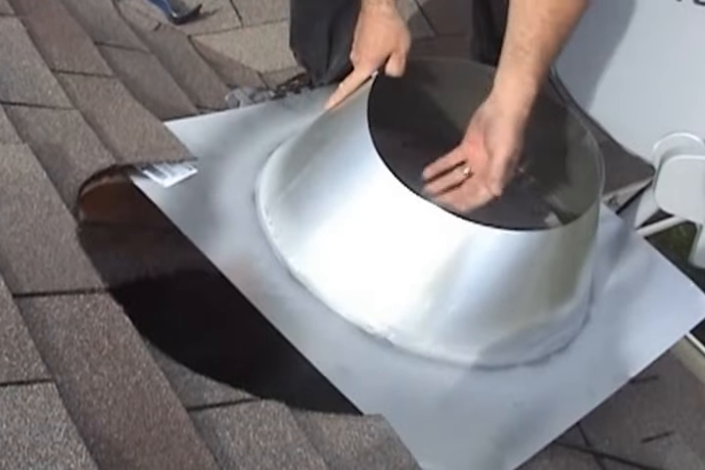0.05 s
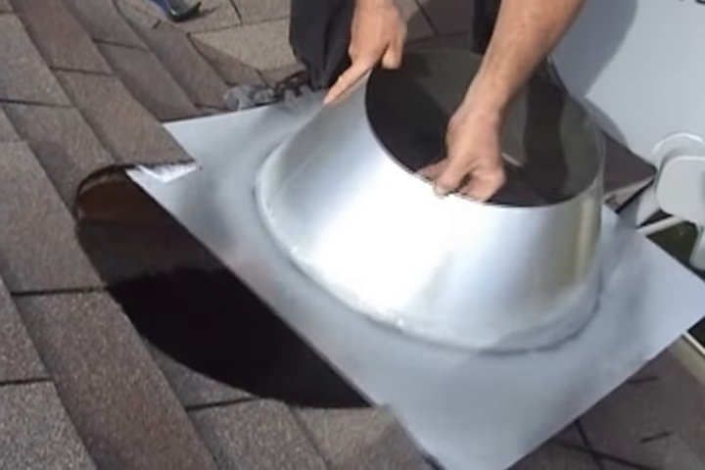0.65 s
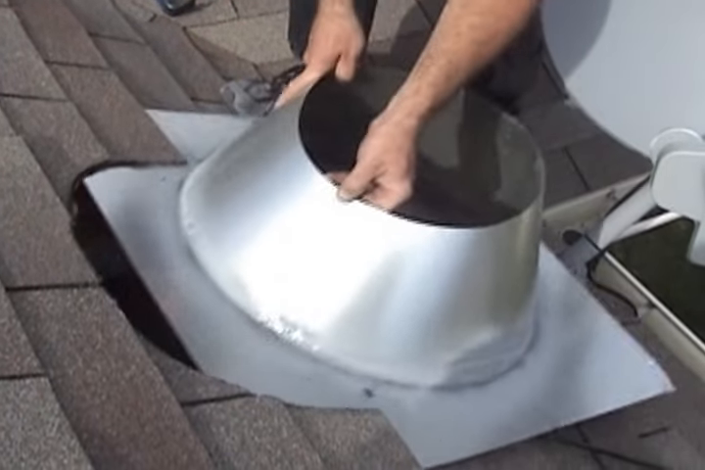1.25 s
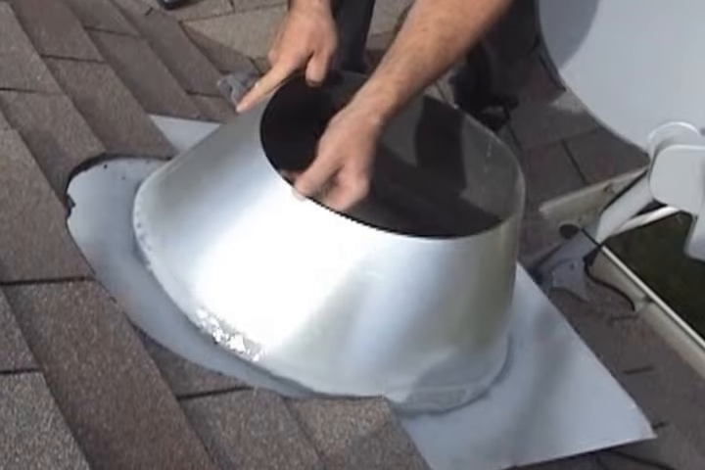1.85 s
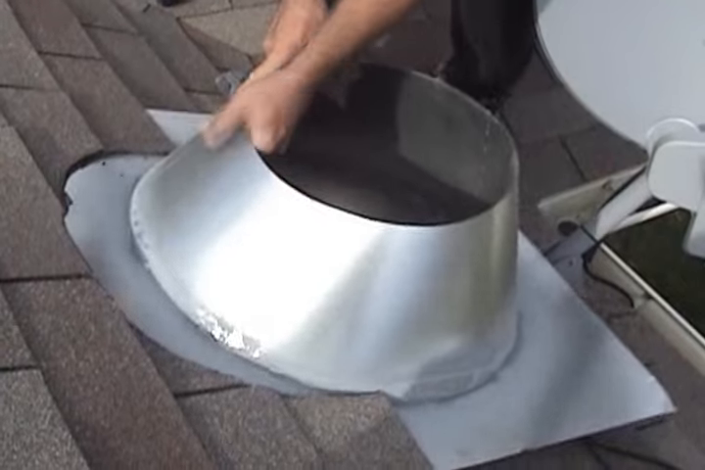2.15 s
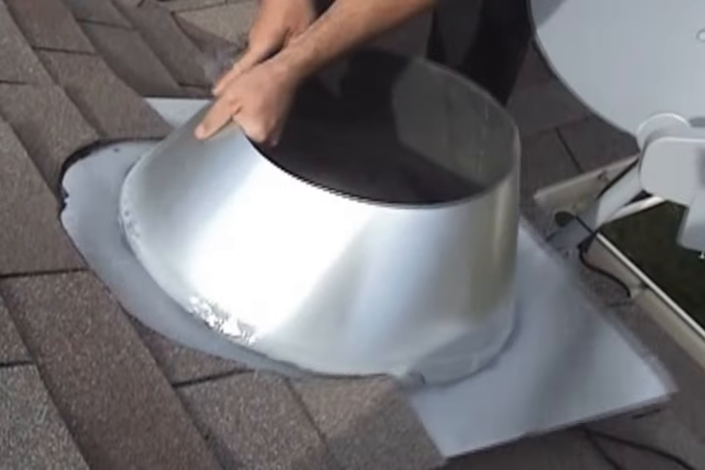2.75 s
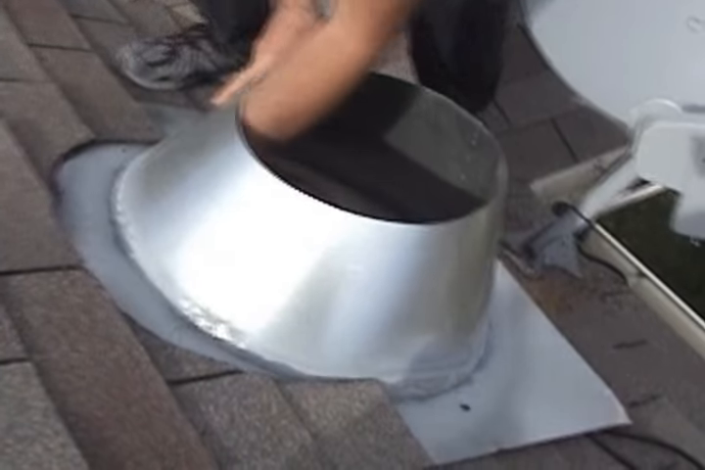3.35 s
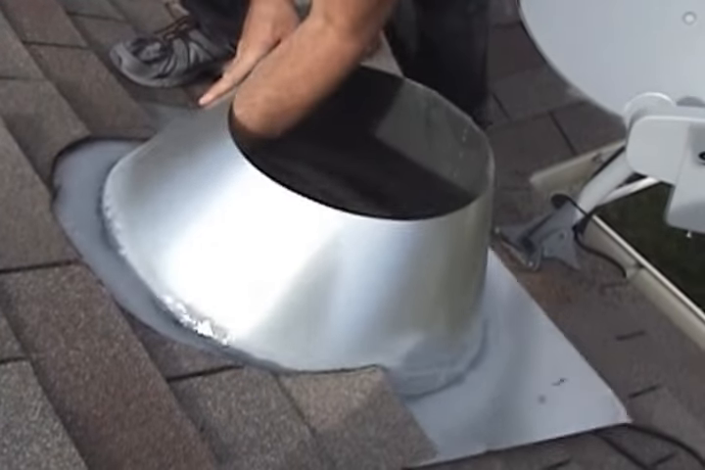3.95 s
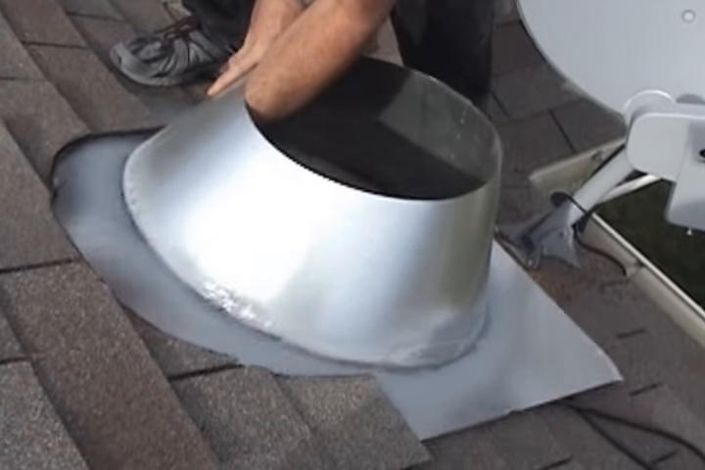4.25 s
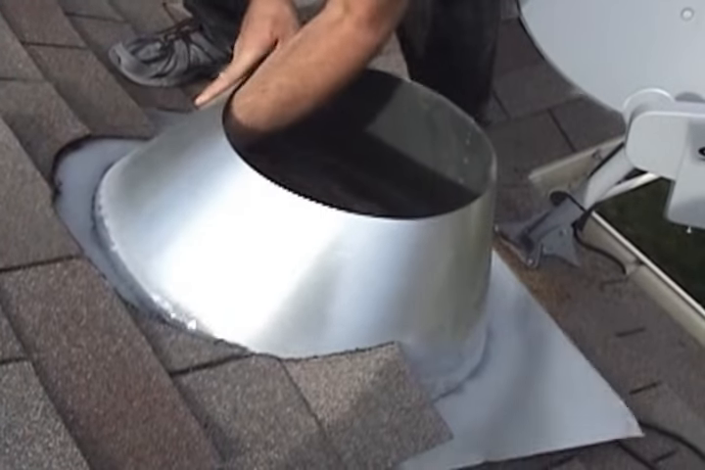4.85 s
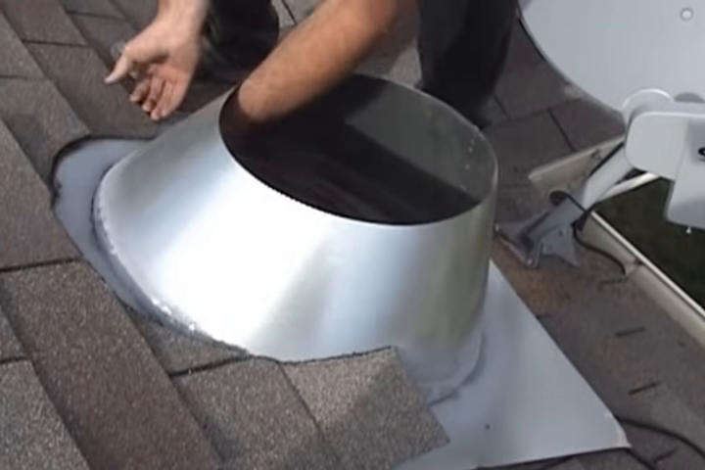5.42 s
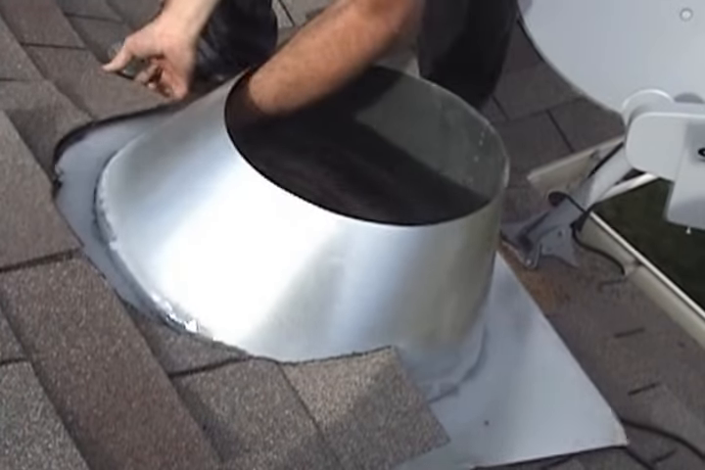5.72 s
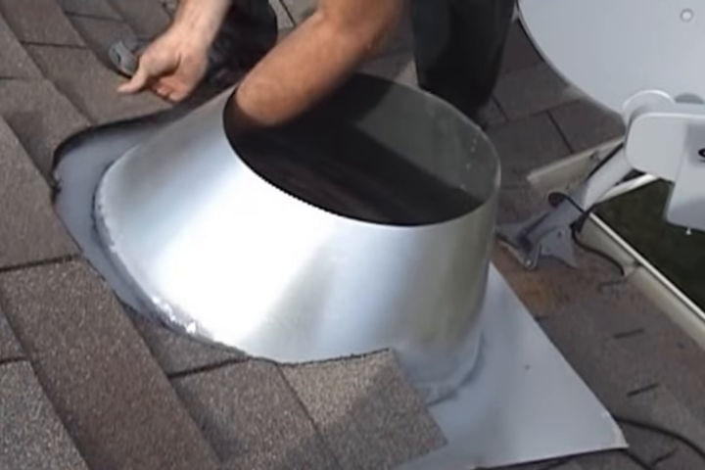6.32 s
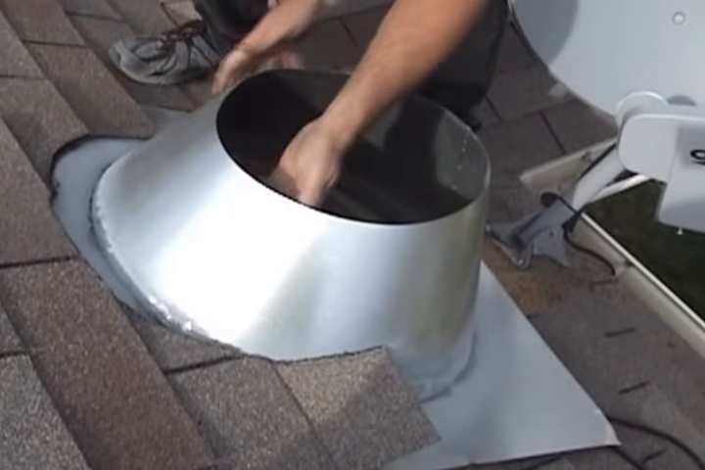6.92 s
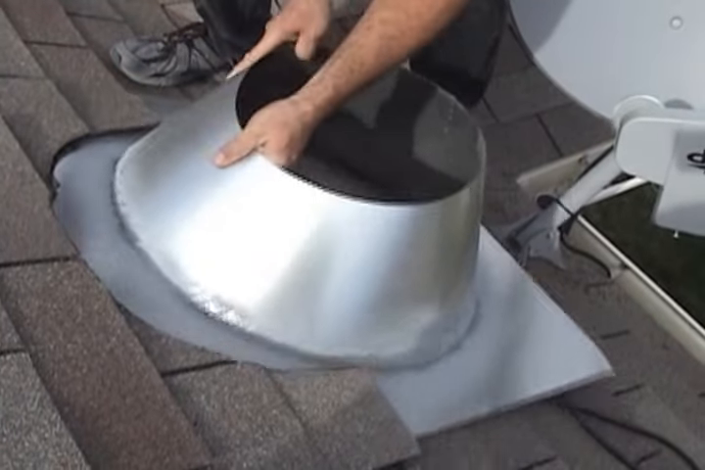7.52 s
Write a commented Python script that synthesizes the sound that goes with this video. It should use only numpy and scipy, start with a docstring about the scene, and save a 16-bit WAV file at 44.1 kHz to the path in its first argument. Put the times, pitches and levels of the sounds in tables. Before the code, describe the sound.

Thin sheet metal is shoved over gritty roof shingles in short scraping bursts, clanking and booming hollowly, while wind buffets the microphone.

```python
"""On an asphalt-shingle roof, hand-held camera about a metre from a sheet-metal flashing with a wide cone.
Wind flutters on the two microphone ports; hands and knees crunch faintly. After a first nudge the
flashing is shoved and wiggled in under the shingles: its edge grinds over the mineral grit, cracks
granules, catches and slips free, and the thin sheet booms as it flexes. A lull comes at 5.5 s, then
more shoves; an eddy thumps the microphone hard at 7 s, just before the last push."""
import sys
import numpy as np
from scipy import signal
from scipy.fft import rfft, irfft, next_fast_len
from scipy.io import wavfile
from scipy.ndimage import map_coordinates

SR = 44100
rng = np.random.default_rng(int(sys.argv[2]) if len(sys.argv) > 2 else 0)


def transcribe(signal):
    """Save signal, clipped to [-1, 1], as a 16-bit WAV file at the path in sys.argv[1]."""
    frames = np.atleast_2d(signal).T
    limited = np.clip(frames, -1, 1)
    pcm = np.round(limited * 32767).astype(np.int16)
    wavfile.write(sys.argv[1], SR, pcm)


N = 338688


def amp(db):
    """Decibels to gain."""
    return 10 ** (np.asarray(db) / 20)


def unit(x):
    """x scaled to rms 1."""
    return x / np.sqrt(np.mean(x ** 2) + 1e-20)


def along(points, hz):
    """(Hz, value) points read on a log frequency axis."""
    f, v = np.transpose(points)
    return np.interp(np.log(hz + 1), np.log(f), v)


def wobble(rate):
    """A smooth random curve, rate knots a second."""
    knots = rng.standard_normal(int(N * rate / SR) + 4)
    return map_coordinates(knots, [np.arange(N) * rate / SR])


def filtered(x, gain):
    """x times a gain that depends on frequency."""
    n = x.shape[-1]
    padded = next_fast_len(n + 2048)
    return irfft(rfft(x, padded) * gain(np.fft.rfftfreq(padded, 1 / SR)), padded)[..., :n]


def noise(colour_db, spread, size):
    """Noise of rms 1 at the left and right ports, as unlike as the spread says."""
    mid, side = rng.standard_normal((2, size))
    side = filtered(side, lambda hz: amp(along(spread, hz)))
    return unit(filtered(np.array([mid + side, mid - side]), lambda hz: amp(colour_db(hz))))


def add(track, start, sound):
    """Mix a sound into the track from a sample on."""
    part = sound[..., :max(N - start, 0)]
    track[..., start:start + part.shape[-1]] += part


# stereo width at the microphone of sound from the roof: f/Hz, side minus mid/dB
ROOF_SPREAD = [(60, -15), (99, -5), (160, -46), (270, -31), (450, -29), (740, -26.5), (1220, -20),
               (2010, -17), (3330, -10.5), (5500, -19), (9080, -8.5), (15000, -33)]
# spectrum of the air around the roof: f/Hz, level/dB
AIR_COLOUR = [(100, -14), (250, -5), (400, -11.5), (800, -4), (1100, -13), (2700, -18.5), (4500, -26),
              (8000, -27.5), (12000, -33.5), (15000, -45)]
def open_air():
    """A faint, nearly steady outdoor rush."""
    drift_db = wobble(6)
    return amp(-45 + drift_db) * noise(lambda hz: along(AIR_COLOUR, hz), ROOF_SPREAD, size=N)


# breeze between the gusts: t/s, level/dB
BREEZE_LEVELS = [(0, -38), (.4, -72), (1, -57), (1.6, -43.5), (2.6, -37), (4.2, -41), (4.45, -44),
                 (5.4, -48), (5.65, -42), (5.95, -52), (6.25, -41), (7.4, -42.5), (7.68, -53)]
# crests of the gusts on the microphone: t/s, level/dB
GUST_CRESTS = [(.19, -36.5), (1.56, -36), (1.8, -27.5), (2.2, -29.5), (3.13, -21.5), (3.298, -20),
               (3.5, -32.5), (3.73, -38), (3.96, -34), (4.06, -23), (4.25, -27), (4.33, -26.5),
               (4.632, -21.5), (4.89, -32.5), (5.12, -31.5), (6.2, -39), (6.61, -28.5), (7.01, -29),
               (7.19, -32), (7.34, -32.5), (7.5, -29)]
# spectra of light flutter and of hard buffeting on the ports: f/Hz, level/dB
FLUTTER_COLOUR = [(20, -48), (60, -6.5), (130, 0), (280, -8.5), (520, -37), (1400, -33.5), (3500, -58)]
BUFFET_COLOUR = [(20, -35), (80, -14), (190, 1), (340, -3.5), (700, -18.5), (1200, -33), (2500, -43),
                 (5000, -59.5)]
# stereo width of wind on the ports: f/Hz, side minus mid/dB
WIND_SPREAD = [(30, -3), (70, 1), (120, 2), (200, 4), (380, 2), (1300, 9)]
def wind(gust_s=0.032):
    """Gusts ride on a breeze and eddies hit each port on its own; harder gusts buffet higher in pitch."""
    t = np.arange(N) / SR
    breeze = amp(np.interp(t, *np.transpose(BREEZE_LEVELS)) + 1.9 * wobble(12))
    gusts = sum(amp(db) * np.exp(-((t - s) / gust_s) ** 2 / 2) for s, db in GUST_CRESTS)
    strength = breeze + gusts
    hard = 1 / (1 + (amp(-30.5) / strength) ** 2)
    flutter = noise(lambda hz: along(FLUTTER_COLOUR, hz), WIND_SPREAD, size=N)
    buffet = noise(lambda hz: along(BUFFET_COLOUR, hz), WIND_SPREAD, size=N)
    eddies = unit(amp(2.2 * np.array([wobble(75), wobble(75)])))
    return strength * eddies * (np.sqrt(1 - hard) * flutter + np.sqrt(hard) * buffet)


def grit(per_second, spread_db):
    """Tiny impacts at random moments, a few much harder than the rest; rms 1 overall."""
    hit = rng.random(N) < per_second / SR
    hardness = amp(spread_db * np.minimum(rng.exponential(size=N), 4))
    return unit(hit * hardness * rng.choice([-1, 1], N))


# peaks and dips of the cone's response: f/Hz, width/Hz, gain/dB
CONE_MODES = [(497, 18, 12), (540, 20, 2.5), (762, 11, 1), (790, 86, 3.5), (1970, 40, -4.5), (2630, 68, -1)]
# decay of the sheet, damped by shingles and hands: f/Hz, t60/s
SHEET_DECAY = [(150, 0.3), (500, 0.29), (900, 0.19), (2500, 0.16), (5000, 0.12), (9000, 0.082),
               (14000, 0.1)]
def sheet(colour):
    """The ring of the sheet struck at one spot: a dense crowd of modes, the high ones dying first."""
    def cone_db(hz):
        return sum(db / (1 + (2 * (hz - centre) / width) ** 2) for centre, width, db in CONE_MODES)

    modes = noise(lambda hz: along(colour, hz) + cone_db(hz), ROOF_SPREAD, size=SR // 4)
    hz, t, bands = signal.stft(modes, SR, nperseg=256)
    decay = amp(-60 * t / along(SHEET_DECAY, hz)[:, None])
    _, ring = signal.istft(bands * decay, SR, nperseg=256)
    return ring[:, :SR // 4]


def rubbed(force, colour, spots=9):
    """The sheet touches the roof at several spots: each impact rings one spot's own mix of modes."""
    spot = rng.integers(spots, size=N)
    out = np.zeros((2, N))
    for k in range(spots):
        ring = sheet(colour)
        impacts = force * (spot == k)
        out += signal.oaconvolve(impacts[None], ring / np.linalg.norm(ring[0]), axes=1)[:, :N]
    return out


# spectra of the sheet when grit scratches it and when its edge bites: f/Hz, level/dB
RASP_COLOUR = [(150, -49), (420, -18), (520, -8.5), (820, -0.5), (1050, -1.5), (1300, 1.5), (1720, -2),
               (1930, 2.5), (2900, 1.5), (3150, -4.5), (4700, -16.5), (7000, -20), (11000, -40),
               (15000, -52)]
BITE_COLOUR = [(1500, -45), (3200, 1.5), (5000, -2), (7200, -1.5), (9000, -3.5), (11500, -10.5),
               (13800, -19), (15200, -48)]
def loose_grit():
    """Knees and hands shift on the shingles and keep a few granules crunching faintly."""
    weight = unit(amp(1.5 * wobble(7) + 3 * wobble(25)))
    shifting = amp(-54) * weight * grit(per_second=110, spread_db=4.5)
    return rubbed(shifting, RASP_COLOUR, spots=3) + amp(-3) * rubbed(shifting, BITE_COLOUR, spots=3)


# single hard eddies right on the microphone: t/s, peak level/dB
EDDY_HITS = [(0.094, -29), (0.199, -32), (1.788, -28.5), (2.203, -28), (2.292, -30), (5.559, -27),
             (5.742, -27), (6.973, -24), (7.004, -14.5), (7.029, -20.5), (7.394, -21), (7.457, -28.5)]
def thumps(rise_s=0.004):
    """A hard eddy is one short, dull push on the ports."""
    out, t = np.zeros((2, N)), np.arange(SR // 12) / SR
    swell = t / rise_s * np.exp(1 - t / rise_s)
    for s, db in EDDY_HITS:
        push = swell * noise(lambda hz: along(BUFFET_COLOUR, hz), WIND_SPREAD, size=len(t))
        add(out, round(s * SR), amp(db) * push / np.abs(push.mean(axis=0)).max())
    return out


# shoves of the sheet under the shingles: t/s, length/s, rise/s, grinding level/dB, flexing level/dB,
# bite relative to grinding/dB, force lost by the end/dB (negative: the push grows)
SHEET_SHOVES = [(0.124, 0.06, .02, -44, -50, 1, 9), (0.483, 0.16, 0.0055, -23.5, -20, -4, 15),
                (0.626, 0.23, 0.0056, -28.5, -23, -9.5, 6.5), (0.845, 0.11, 0.05, -33.5, -22, 7, 5.5),
                (0.944, .13, 0.0072, -24, -29.5, -5.5, -4.5), (1.105, 0.41, 0.014, -15.5, -17, -4.5, 6),
                (1.508, 0.21, 0.029, -19, -23.5, -5.5, -0.5), (1.74, 0.037, 0.012, -25.5, -27, -10.5, 3),
                (1.836, 0.044, 0.0045, -18.5, -26, -15, 4), (2.009, 0.067, 0.0037, -25.5, -25.5, -11, 2.5),
                (2.42, 0.094, 0.0015, -15.5, -13.5, -22, 11.5),
                (2.492, 0.18, 0.0084, -34.5, -25.5, -3.5, -5),
                (2.662, 0.2, 0.0026, -25.5, -12.5, -5.5, 2.5),
                (2.874, 0.17, 0.0078, -28.5, -21, -9.5, -2.5), (3.007, 0.052, 0.0046, -18.5, -23, -20, 14),
                (3.067, 0.22, .01, -36.5, -30, -10.5, 5), (3.597, 0.14, 0.04, -23.5, -24.5, -5, -1),
                (3.778, 0.032, 0.0041, -24, -15, -6, -3.5), (3.851, 0.18, .01, -30, -16, -2, 16),
                (4.04, 0.24, 0.011, -26, -14.5, -8.5, 13), (4.251, .15, 0.064, -19, -26, -6, -4),
                (4.451, 0.046, 0.024, -22, -22.5, -7.5, 0.5), (4.684, 0.23, 0.052, -12.5, -17.5, -4, 11),
                (4.944, 0.14, 0.0036, -20, -14, -27, 23), (5.084, 0.065, 0.0041, -36, -20.5, -20, 11),
                (5.172, 0.18, .005, -26, -17.5, -8.5, 18.5), (5.754, 0.12, .02, -39.5, -47, 0.5, 1),
                (6.003, 0.06, 0.0025, -21, -23, -15, 7.5), (6.074, 0.19, 0.0055, -22.5, -13, -11.5, 19),
                (6.544, 0.17, 0.0025, -25, -22.5, -12.5, 27), (6.687, 0.04, 0.0042, -32.5, -30, -3.5, 10),
                (6.859, 0.078, 0.015, -35, -46, -3, 7.5), (7.108, 0.075, 0.011, -42, -46.5, -8, -9.5),
                (7.536, 0.17, 0.024, -17.5, -19.5, -6.5, -1)]
def shove_forces(release_s=0.011):
    """Grinding, flexing and bite over time: each shove builds up, changes force steadily and stops."""
    forces, t = np.zeros((3, N)), np.arange(SR) / SR
    for s, length, rise, grind_db, flex_db, bite_db, loss_db in SHEET_SHOVES:
        levels = amp([[grind_db], [flex_db], [grind_db + bite_db]])
        attack = np.minimum(t / rise, 1)
        hold = amp(-loss_db * np.minimum(t / length, 1))
        release = np.exp(-np.maximum(t - length, 0) / release_s)
        add(forces, round(s * SR), levels * attack * hold * release)
    return forces


# path of the sheet's hollow resonance: t/s, f/Hz
HOLLOW_GLIDE = [(0.48, 570), (2.02, 745), (2.24, 560), (2.28, 700), (3.45, 665), (3.53, 839), (3.89, 587),
                (4.53, 840), (4.61, 497), (4.71, 790), (5.01, 690), (6.61, 680), (6.94, 792), (7.0, 514),
                (7.18, 749), (7.42, 525), (7.58, 820), (7.68, 730)]
def bent(boom, lift_db, half_width_hz=55):
    """Bending retunes the boom: its hollow resonance glides, held between 520 and 797 Hz."""
    steps_hz = [520, 601, 690, 797]
    centre_hz = np.interp(np.arange(N) / SR, *np.transpose(HOLLOW_GLIDE)) + 55 * wobble(14)
    out = np.zeros_like(boom)
    for peak_hz, share in zip(steps_hz, np.eye(len(steps_hz))):
        lifted = filtered(boom, lambda hz: amp(lift_db / (1 + ((hz - peak_hz) / half_width_hz) ** 2) - 3))
        out += np.interp(centre_hz, steps_hz, share) * lifted
    return out


# spectra of the sheet flexing and of the whole base plate heaving: f/Hz, level/dB
FLEX_COLOUR = [(20, -60), (60, -48), (120, -23.5), (190, -13.5), (270, -9.5), (340, -2.5), (408, -15),
               (485, -3), (590, -2), (780, -2), (900, 0), (1080, -6.5), (1450, -8), (1750, -13),
               (4000, -55)]
HEAVE_COLOUR = [(20, -49), (60, -59), (120, -16), (180, -6.5), (250, 3), (330, -11), (420, -16), (700, -42),
                (2000, -80)]
def scraping():
    """A metre off, the edge drags over the grit: it rasps, hisses where it bites and shakes the sheet."""
    grind, flex, bite = shove_forces()
    judder = amp(2.3 * wobble(70))  # the edge sticks and lets go
    # a fast slide meets a stream of granules, a slow push breaks them one by one
    sliding = 1 / (1 + (amp(-28.5) / (grind + 1e-6)) ** 2)
    stream = grit(per_second=2600, spread_db=4)
    crumbs = grit(per_second=350, spread_db=11)
    granules = unit(judder * (np.sqrt(sliding) * stream + np.sqrt(1 - sliding) * crumbs))
    lurches = unit(judder * grit(per_second=1200, spread_db=2.5))
    surge = unit(amp((3.5 - 1.56 * sliding) * wobble(28)))  # coarse and fine patches, evened by speed
    rasp = amp(0.5) * rubbed(grind * surge * granules, RASP_COLOUR)
    hiss = rubbed(bite * granules, BITE_COLOUR)
    boom = amp(-2) * bent(rubbed(flex * lurches, FLEX_COLOUR, spots=4), lift_db=8)
    # an edge that is held fast lets the push bend the whole plate
    heave = amp(-8.5) * rubbed(flex * np.sqrt(1 - sliding) * lurches, HEAVE_COLOUR, spots=4)
    # granules crushed under the load also tick straight into the air
    crushed = grit(per_second=90, spread_db=4)
    ticks = unit(filtered(crushed, lambda hz: amp(along(BITE_COLOUR, hz))))
    load = amp(-12) * bite + amp(-31.5) * flex
    return rasp + hiss + boom + heave + load * ticks


# single granules cracking under the metal: t/s, level/dB
GRANULE_CRACKS = [(0.289, -24), (0.470, -19), (0.598, -15), (0.719, -26), (2.506, -2), (2.668, -1),
                  (2.906, -7.5), (3.099, -17), (3.864, -11), (3.868, -13), (3.8775, -18), (3.8903, -8),
                  (3.9103, -3), (4.083, -6), (4.160, -22), (4.241, -9), (6.089, -10)]
def cracks(decay_s=0.00016):
    """A bursting granule gives one dry click."""
    out, t = np.zeros(N), np.arange(SR // 200) / SR
    fade = np.exp(-t / decay_s)
    for s, db in GRANULE_CRACKS:
        pitch_hz = 5000 * np.exp(0.2 * rng.standard_normal())
        add(out, round(s * SR), amp(db + 1) * np.sin(2 * np.pi * pitch_hz * t) * fade)
    return out


# modes of the cone's rim: f/Hz, level/dB, t60/s
RIM_MODES = [(808, -1, 0.061), (844, -11, 0.15), (1260, -31, .1), (1970, -18, 0.09), (2670, -8, 0.25),
             (3610, -21, .08), (3740, -18, 0.11), (4400, -7, 0.11)]
def rim_ping(t):
    """The struck rim rings, at new strengths and slightly new pitches each time."""
    age = np.maximum(t, 0)
    chance = rng.standard_normal((len(RIM_MODES), 2))
    out = np.zeros(len(t))
    for (hz, db, t60), (louder, sharper) in zip(RIM_MODES, chance):
        fade = amp(db + 3 * louder - 60 * age / t60)
        out += fade * np.sin(2 * np.pi * hz * (1 + 0.011 * sharper) * age)
    return out


# the edge catches, slips and slaps down: t/s, level/dB, boom relative to that level/dB
EDGE_SLIPS = [(0.3321, -3.5, -40), (0.3384, -2.5, -34), (0.4318, -21.5, 2.5), (0.487, -7.5, -5.5),
              (0.5372, -7, -28), (0.6464, -7, 3.5), (0.95, -26, -31), (1.1255, -4, -23), (1.8447, -18.5, 4),
              (1.941, -14.5, -10), (2.0133, -16, 6), (2.0752, -7.5, -10), (2.1425, -19.5, 1),
              (2.4225, -14.5, 8.5), (2.503, -6.5, -4), (2.5371, -14, 4), (2.6667, -3.5, 4.5),
              (2.7544, -20.5, 20), (2.8514, -25, 21), (3.015, -5.5, -3), (3.0975, -15, -19),
              (3.1807, -14, 4), (3.3573, -19, 5), (3.536, -1.5, -24), (3.6275, -9, -22), (3.7799, -7, 6),
              (3.8067, -2, -6.5), (3.9095, -9, -2.5), (4.0492, -11, -4), (4.0811, -0.5, -3.5),
              (4.118, -7.5, -2.5), (4.2255, -12.5, -3), (4.7182, -2, -14), (4.9477, -14.5, 5),
              (4.9637, -5.5, 0), (5.1699, -12.5, -5), (5.1926, -4.5, -2), (5.2375, -11, 1),
              (5.6397, -16.5, -10), (5.7923, -19, -1), (5.9768, -19, -1), (6.0154, -16.5, 11),
              (6.0748, -11, -11), (6.0853, 1, -14), (6.175, -20, -8), (6.2088, -11.5, -5.5),
              (6.2866, -23, -18), (6.55, -13, -3), (6.7097, -22, -4), (7.1104, -25, 2),
              (7.2827, -22.5, -2.5), (7.5296, -11, -11), (7.589, -4, -7)]
def slips(flat_dulls_db=6):
    """A sharp strike with a very short, faint swell just before it; the sheet clashes and booms."""
    clashes, booms = np.zeros((2, 2, N))
    lead = SR // 150
    t = (np.arange(SR // 4) - lead) / SR
    swell = np.where(t < 0, 0.13 * np.exp(-np.abs(t) / 0.003), 1)
    strike = 1 + 0.29 * np.exp(-np.abs(t) / 0.0069)  # the struck spot sounds before the waves spread
    for s, db, boom_db in EDGE_SLIPS:
        start = round(s * SR) - lead
        flat = 1 / (1 + amp(-2 * boom_db))  # a sheet that lands flat booms and loses treble
        edge = amp(0.5 - flat_dulls_db * flat)
        clash = sheet(RASP_COLOUR) + edge * sheet(BITE_COLOUR) + amp(-7) * rim_ping(t)
        add(clashes, start, amp(db - 12.5) * swell * strike * clash)
        add(booms, start, amp(db + boom_db - 7) * swell * sheet(FLEX_COLOUR))
    return clashes + bent(booms, lift_db=6)


def scene():
    """The work on the roof a metre away, wind right on the microphone, open air all round."""
    roof_work = scraping() + slips() + cracks() + loose_grit()
    return roof_work + wind() + thumps() + open_air()


def record(dry):
    """The camera rounds off the highest peaks and keeps nothing above its band limit."""
    top_hz = 14950
    rounded = dry / (1 + np.abs(dry) ** 6) ** (1 / 6)
    return filtered(rounded, lambda hz: 1 / np.sqrt(1 + (hz / top_hz) ** 120))


dry = scene()
out = record(dry)
transcribe(out)
```